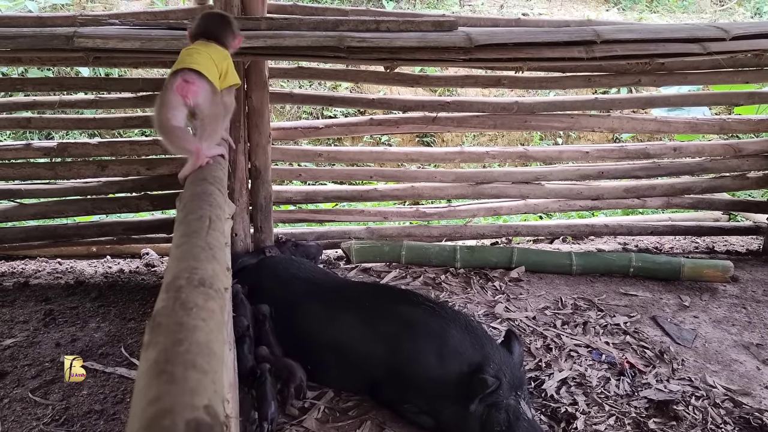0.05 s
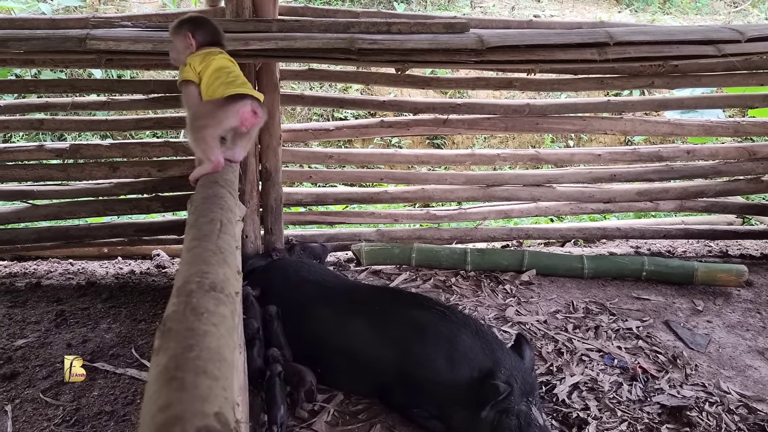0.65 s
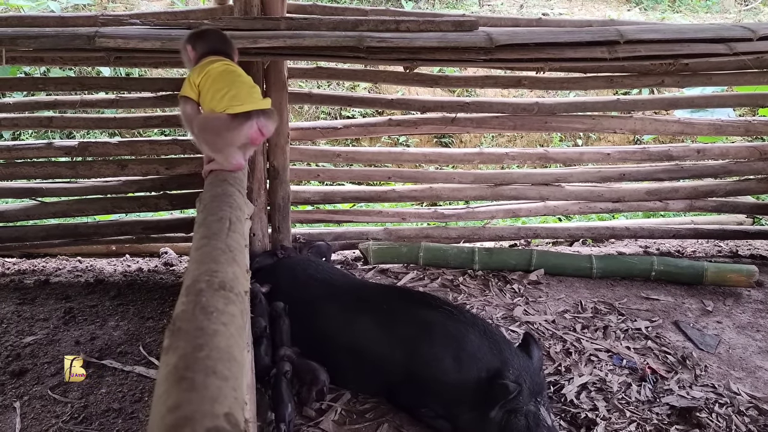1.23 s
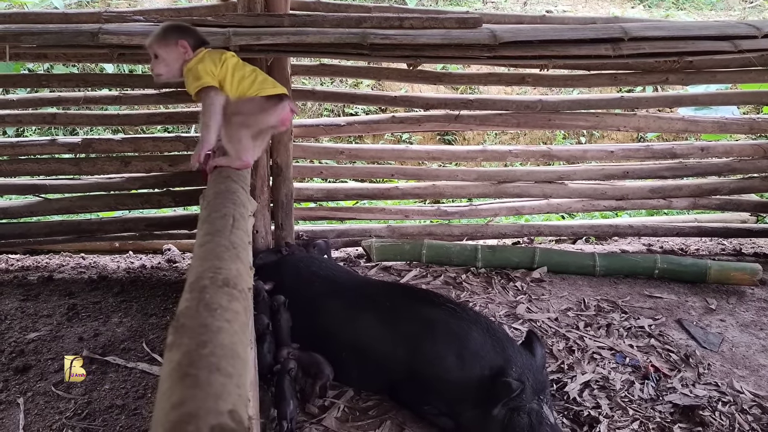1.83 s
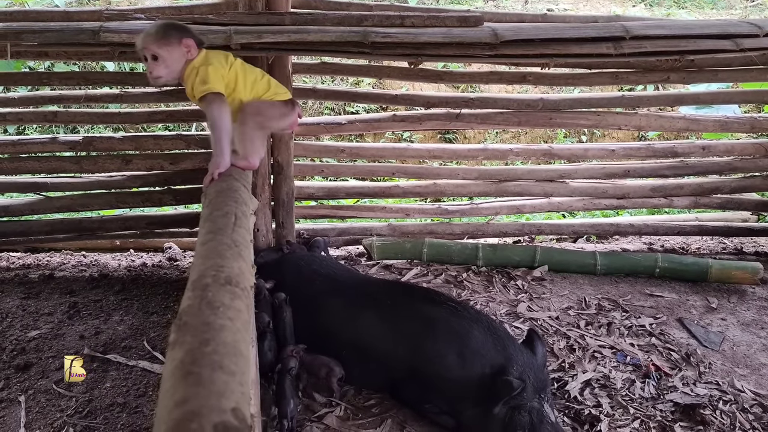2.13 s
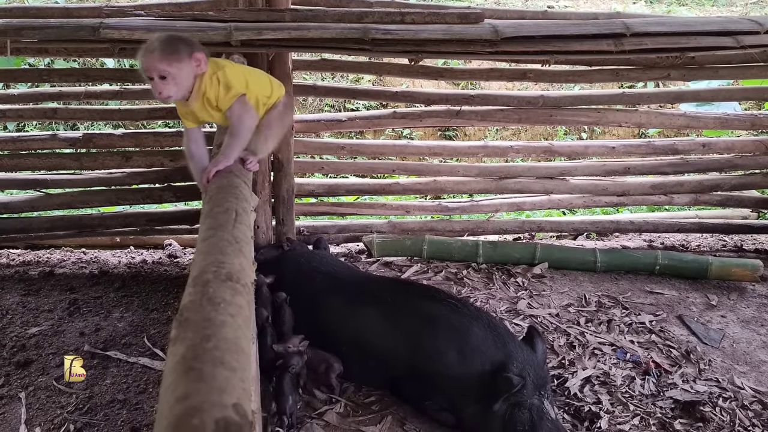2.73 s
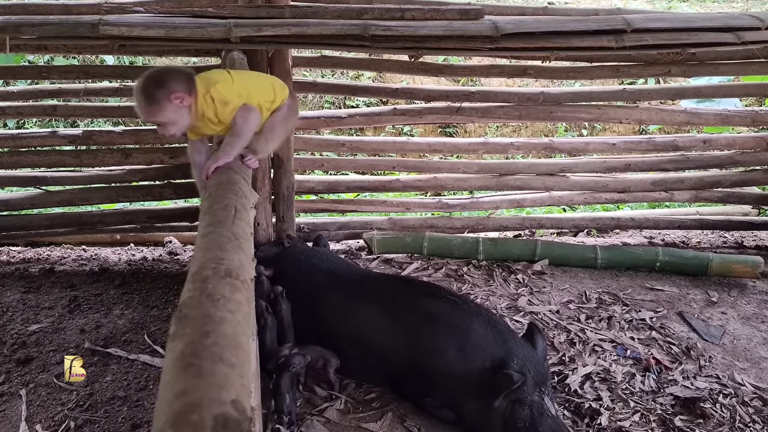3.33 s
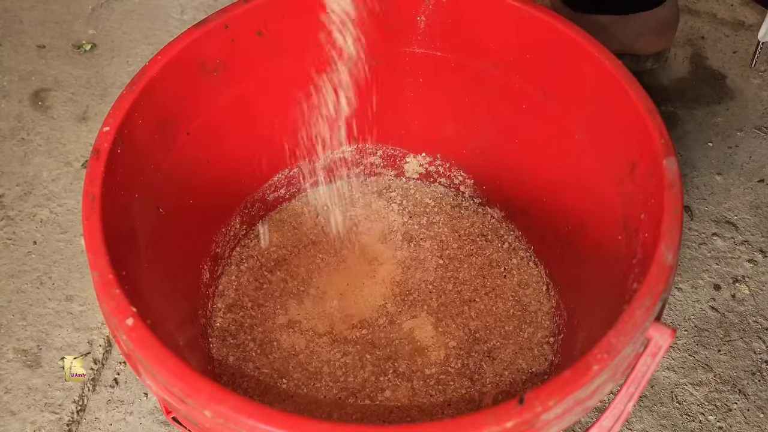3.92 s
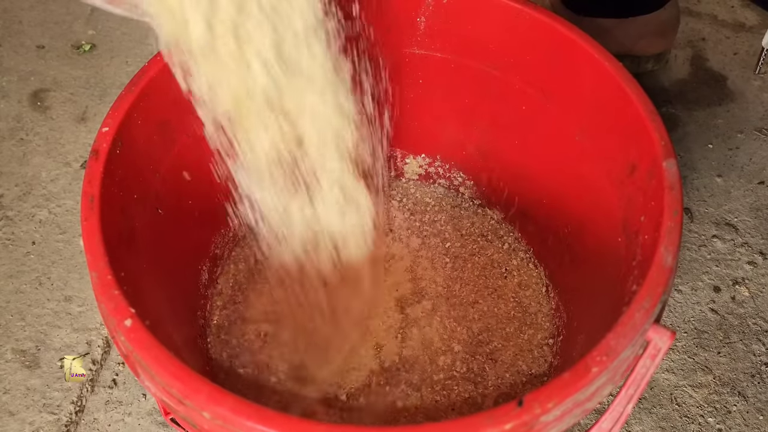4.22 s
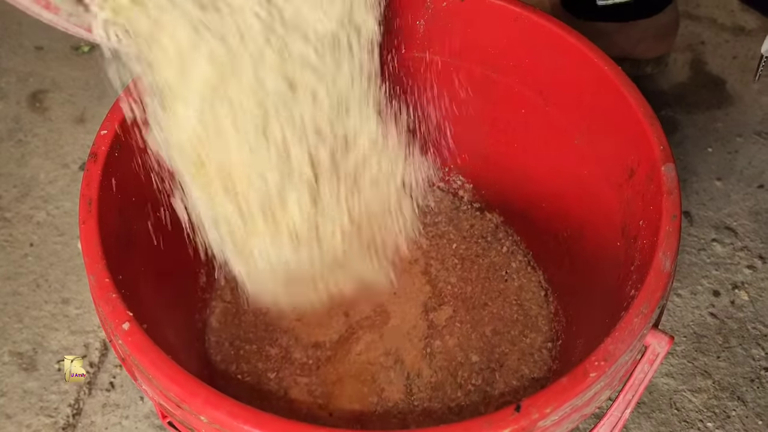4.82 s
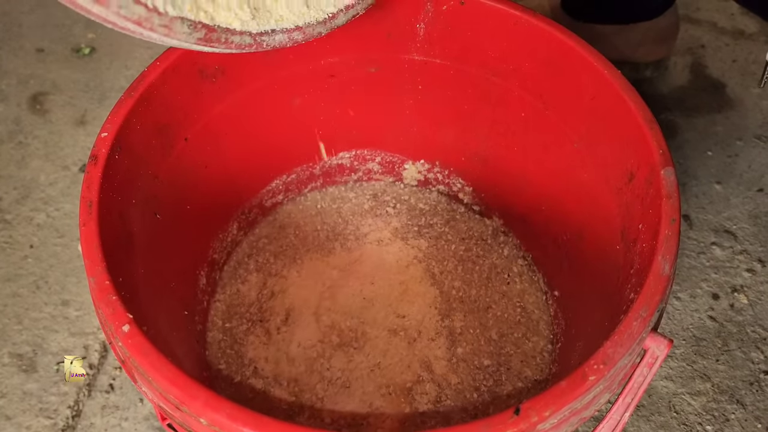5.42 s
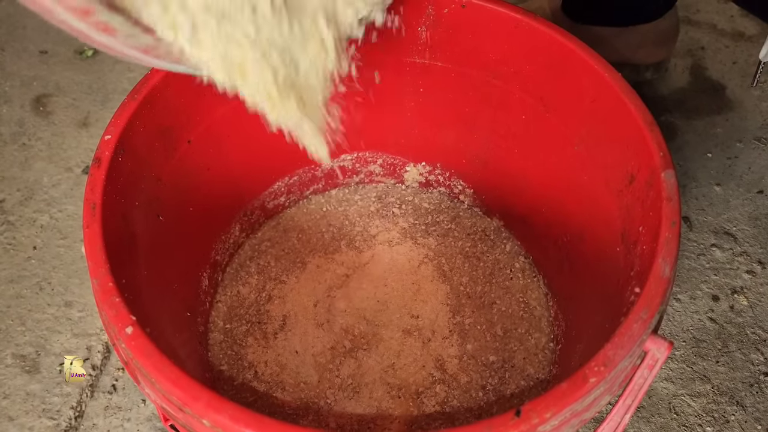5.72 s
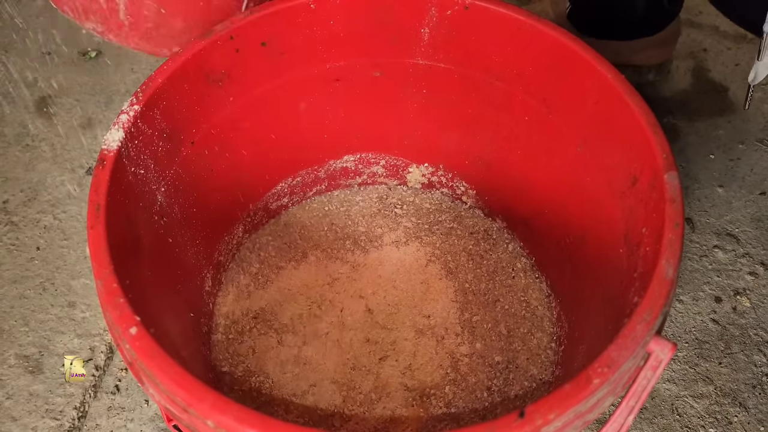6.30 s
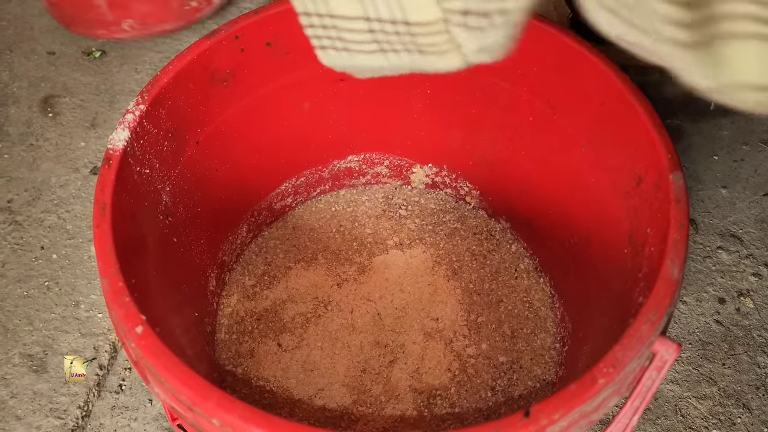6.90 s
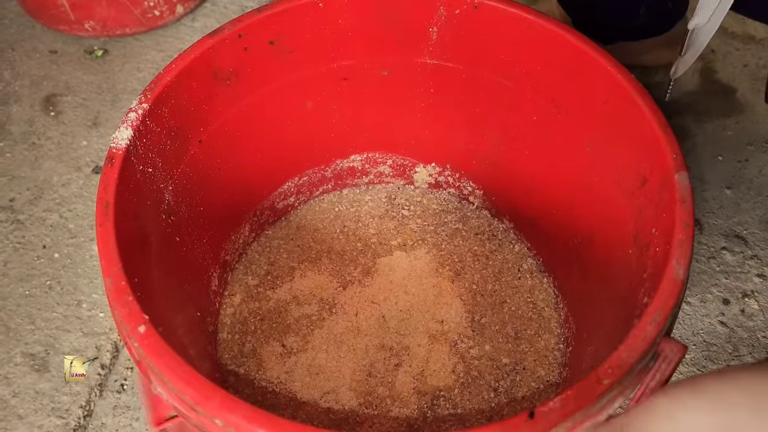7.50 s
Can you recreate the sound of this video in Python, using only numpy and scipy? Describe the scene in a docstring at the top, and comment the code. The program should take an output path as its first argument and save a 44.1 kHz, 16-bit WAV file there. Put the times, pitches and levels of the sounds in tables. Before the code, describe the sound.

In a quiet outdoor pen a pig grunts softly twice while cicadas drone, a bird whistles and a faint, distant rooster crows once. The sound switches to a yard with shriller cicadas. Close by, a bowl digs dry meal from a sack with hollow knocks and pours it, hissing and pattering, into a plastic bucket. Finally the sack crumples and the bowl is put down with a loud thud.

```python
"""In a slatted pen a pig grunts softly twice, its throat pulses ringing chest and snout, while cicadas
drone with clicking tymbals. A bird whistles now and then, and a far rooster holds one crow.
Then, in a yard with shriller cicadas, a bowl digs dry meal from a sack and pours it into a plastic
bucket: impacts ring the bowl, friction rasps, and falling grains hiss and patter.
At the end the sack crumples in small snaps and the bowl is put down with a thud."""
import sys
import numpy as np
from scipy import signal
from scipy.fft import rfft, irfft, next_fast_len
from scipy.io import wavfile
from scipy.ndimage import uniform_filter1d

SR = 44100
rng = np.random.default_rng(int(sys.argv[2]) if len(sys.argv) > 2 else 0)


def master_out(mix):
    """Clip the mix to full scale and print it as 16-bit PCM to the path in sys.argv[1]."""
    frames = np.transpose(np.atleast_2d(mix))
    ceiling = np.clip(frames, -1, 1)
    pcm = np.round(ceiling * 32767).astype(np.int16)
    wavfile.write(sys.argv[1], SR, pcm)


N = 332955
TIME = np.arange(N) / SR

# grunts (time [s], length [s], effort [dB], first pulse rate [Hz], mouth opening [dB])
PIG_GRUNTS = [(0.188, 0.104, -56, 89, 0), (0.665, 0.19, -37.5, 75.9, 4.5)]
# resonances of the pig's chest and snout (frequency [Hz], bandwidth [Hz], gain [dB])
CHEST_FORMANTS = [(58, 30, -11), (184, 50, 4), (254, 44, 7), (443, 67, -8)]
SNOUT_FORMANTS = [(590, 200, -26), (1180, 160, -21.5), (1562, 63, -22.5), (3200, 900, -36)]
# the bowl knocks into the meal, thumps out of it, and clatters as it is put down
# (time [s], push level [dB], push frequency [Hz], clack level [dB], clack centre [Hz], chatter decay [s])
BOWL_BUMPS = [(3.9261, -28, 470, -39.5, 1470, 0.0014), (4.057, -23, 145.5, -41, 1490, 0.0057),
              (4.686, -29.5, 448, -41, 1380, 0.0041), (4.775, -25, 144, -41, 1310, .0027),
              (5.647, -41.5, 410, -79, 1000, 0.002), (5.724, -31.5, 141, -50.5, 1310, 0.0036),
              (6.5249, -36, 384, -38.5, 1650, 0.0022), (6.826, -26.5, 97, -36, 1925, 0.024),
              (6.8599, -36, 380, -32, 1240, 0.0045), (6.9, -36, 280, -35, 1134, 0.014),
              (6.96, -38, 380, -35, 1794, 0.0061), (7.0257, -6.5, 350, -28, 1550, 0.006),
              (7.056, -21.5, 281, -38.5, 2300, 0.0035)]
# modes of the whole bowl (frequency [Hz], gain [dB], T60 after a 400 Hz push [s])
BOWL_MODES = [(131.2, -14.5, 0.35), (162.2, -4.5, 0.26), (221, -15, 0.07), (304, -7.5, 0.27),
              (339.8, 10.5, 0.079), (394, 0, 0.16), (474, 0, 0.097), (531.3, -1, 0.14), (943, -12.5, 0.11),
              (2270, -12.5, 0.4)]
# short, hollow modes of its wall (frequency [Hz], bandwidth [Hz], gain [dB])
WALL_MODES = [(560, 81, 9.5), (1000, 80, 0), (1298, 150, 6), (1805, 110, 3.5), (2110, 210, 10),
              (3070, 290, 11)]
# rubs of bowl, meal and litter (peak time [s], level [dB], swell time [s], tilt [dB/octave])
RUB_STROKES = [(0.046, -50.5, 0.02, 3), (1.42, -64.5, 0.039, 5), (2.031, -58, 0.058, 4.5),
               (3.6, -60, 0.14, 3), (3.984, -37.5, 0.039, 0.5), (4.722, -40, 0.033, -0.15),
               (5.7, -51.5, 0.035, 0.5), (6.195, -52.5, 0.097, 1.5), (7.048, -29.5, 0.017, -2.3)]
# pours of meal (time [s], length [s], decay [s], spray level [dB], patter level [dB])
MEAL_POURS = [(3.764, 0.28, 0.087, -57.5, -60), (4.15, 0.12, 0.21, -54, -64),
              (4.894, 0.073, 0.16, -57, -64.5), (5.892, 0.15, 0.036, -57, -57),
              (6.047, 0.032, 1, -64.5, -55.5), (6.716, 0.23, 0.11, -58.5, -54.5),
              (7.342, 0.076, 0.058, -64, -55)]
# crumples of the sack and ticks of the bowl (time [s], level [dB], length [s], tilt [dB/octave])
SACK_CRUMPLES = [(4.171, -42, 0.013, 3), (4.493, -47.5, 0.0033, 5), (4.898, -50, 0.028, 0),
                 (6.527, -30, 0.003, -2), (6.822, -38.5, 0.025, -2.5), (6.865, -35, 0.012, -2),
                 (6.895, -34.5, 0.025, -1.5), (6.956, -38.5, 0.026, -2), (6.99, -35.5, 0.03, -2),
                 (7.018, -32, 0.0029, 5.5)]
# spectra of rubbing, fine meal, coarse meal and the sack (frequency [Hz], relative density [dB])
RUB_SPECTRUM = [(35, -31), (60, -4.5), (156, 4), (215, -8), (368, -6.5), (756, -20), (999, -1.5),
                (1200, -17), (1420, -5), (2200, -6), (5580, -12.5), (15500, -24.5)]
SPRAY_SPECTRUM = [(2500, -28), (4000, 19), (6500, 15.5), (10000, 11.5), (15500, 14)]
PATTER_SPECTRUM = [(100, -13), (330, 2), (650, -7.5), (1000, 0), (1700, 1.5), (2400, 5.5), (3600, -0.5),
                   (6000, -14.5), (12000, -35)]
SACK_SPECTRUM = [(35, -16), (171, -8), (385, -4), (673, -18), (1100, -7), (3580, -6), (8470, -11),
                 (15500, -17)]
# scrapes and light taps (time [s], length [s], level [dB], resonance [Hz], bandwidth [Hz])
HOLLOW_SCRAPES = [(3.044, 0.039, -57, 1750, 905), (3.955, 0.052, -39.5, 2275, 190),
                  (4.196, 0.27, -59, 960, 330), (5.017, 0.028, -55, 2470, 450),
                  (5.128, 0.053, -56, 1960, 650), (5.289, 0.022, -57, 2300, 700),
                  (6.641, 0.015, -44, 2850, 1490), (7.264, .009, -48, 2500, 1110),
                  (7.363, 0.14, -51.5, 1690, 490), (7.514, .016, -49.5, 2310, 806)]
# phrases of the cicada by the pen (start [s], end [s], level [dB])
CICADA_PHRASES = [(-.35, 0.222, -62.5), (0.74, 1.412, -61), (1.68, 2.493, -60.5), (2.798, 3.732, -61.5)]
# swell of the cicadas by the yard (time [s], level of each broad band [dB])
CHORUS_LEVELS = [(3.8, -68), (4.1, -64), (5.2, -61)]
# bird notes (time [s], length [s], start pitch [Hz], end pitch [Hz], relative level [dB])
BIRD_WHISTLES = [(0.859, 0.072, 2850, 4450, -58), (1.183, 0.042, 3210, 2810, -61.5),
                 (1.969, 0.026, 1000, 1040, -60.5), (1.363, 0.071, 2910, 4130, -59.5),
                 (1.815, 0.075, 4570, 2915, -60), (2.703, 0.08, 2890, 4290, -61),
                 (2.84, 0.043, 4380, 4310, -54), (2.893, 0.068, 4390, 2950, -57.5),
                 (5.377, 0.072, 4790, 3860, -55), (5.46, 0.22, 3240, 3310, -64),
                 (7.187, 0.036, 4570, 3906, -53)]
# swells of the crow (crest time [s], half-width [s], relative level [dB])
ROOSTER_SWELLS = [(2.55, 0.088, -66), (2.86, 0.15, -65), (3.16, 0.072, -63), (3.42, 0.11, -62.5),
                  (3.68, 0.053, -62.5)]
# spectra of the steady air in the two places (frequency [Hz], relative density [dB])
PEN_SPECTRUM = [(25, -9), (58, -2.5), (100, 2.5), (170, -1), (300, -13), (620, -9), (1400, -11.5),
                (2650, -15.5), (3250, -7), (3700, -13.5), (5600, -16.5), (8200, -10), (10800, -31),
                (15500, -29.5)]
YARD_SPECTRUM = [(25, -8.5), (50, 10), (100, 6.5), (320, -16.5), (720, -8.5), (1100, -17), (2300, -8),
                 (2800, -5), (4700, 1.5), (5800, -12), (7200, -6.5), (10000, -6.5), (11500, -22),
                 (15500, -38.5)]
# decay of the reflections (frequency [Hz], T60 [s])
REVERB_TIMES = [(80, 0.25), (350, 0.27), (900, 0.28), (2200, 0.25), (6000, 0.2), (14000, 0.051)]
# likeness of left and right (frequency [Hz], correlation [-1 to 1])
STEREO_COHERENCE = [(120, 0.92), (480, 0.63), (800, -0.04), (2200, 0.067), (3800, -0.34), (7000, 0.074)]

YARD_START_S, BAND_LIMIT_HZ = 3.78, 15700


def pig():
    """Source and filter: slowing throat pulses ring the chest; breath rasps in the snout as it opens."""
    rise, fade_start, sag = 0.25, 0.37, 0.175  # shares of the grunt's length
    opens, snap, close = 0.2, 0.05, 0.52  # the mouth's motion, in the same shares
    slack_hz, fade_db = 40.37, 22
    out = np.zeros(N)
    for start, length, effort_db, first_hz, mouth_db in PIG_GRUNTS:
        progress = np.arange(0, length, 1 / SR) / length
        spent = np.interp(progress, [fade_start, 1], [0, 1])
        effort = np.minimum(progress / rise, 1) ** 1.7 * gain_of(-fade_db * spent)
        mouth = gain_of(mouth_db) * np.clip((progress - opens) / snap, 0, 1)
        mouth *= np.exp(-((progress - opens - snap) / close) ** 2)
        pulse_hz = slack_hz + (first_hz - slack_hz) * np.exp(-progress / sag)
        cycles = np.cumsum(pulse_hz * (1 + .025 * wander(len(progress), 70))) / SR
        pulses = np.diff(np.floor(cycles), prepend=0)
        puffs = .08 * np.exp(-(cycles % 1) / .35) * rng.standard_normal(len(progress))
        sink = 1 - 0.24 * spent  # the throat slackens, so its resonances sink
        chest = sum(gain_of(db) * resonate(pulses, hz * sink, width) for hz, width, db in CHEST_FORMANTS)
        snout = sum(gain_of(db) * resonate(puffs, hz, width) for hz, width, db in SNOUT_FORMANTS)
        add(out, start, gain_of(effort_db) * effort * unit_rms(chest + mouth * snout))
    return out + gain_of(-17) * reverb(out)


def bowl_bumps():
    """Impact excitation: a heavily damped push, the low ring of the bowl and a hollow clack."""
    out, t = np.zeros((2, N)), np.arange(SR // 2) / SR
    for start, push_db, push_hz, clack_db, clack_hz, chatter_s in BOWL_BUMPS:
        age = t * push_hz / 0.54  # the envelope peaks after about half a cycle
        push = -np.sin(2 * np.pi * push_hz * t) * age * np.exp(1 - age)
        ring_db = push_db - 15 - 5 * np.log2(push_hz / 146)  # slow pushes ring the bowl more
        ring = gain_of(ring_db) * bowl_ring(push_hz, t)
        clack = gain_of(clack_db) * wall_clack(clack_hz, chatter_s, t)
        add(out, start, gain_of(push_db) * push + ring + clack)
    return panned(out, right_db=-1.5)


def bowl_ring(push_hz, t):
    """Modal decay: a soft, slow push damps the bowl sooner and barely excites its high modes."""
    ring = np.zeros((2, len(t)))
    for hz, db, t60 in BOWL_MODES:
        decay_db = 60 * t / (t60 * (push_hz / 400) ** 0.33)
        rolloff = np.hypot(1, hz / (7.6 * push_hz))
        offset_s = rng.normal(0, 0.0001, (2, 1))  # high modes reach the two sides less alike
        ring += gain_of(db - decay_db) / rolloff * np.sin(2 * np.pi * hz * (t + offset_s))
    return ring * (1 - np.exp(-t / 0.0013))


def wall_clack(centre_hz, chatter_s, t, spread_octaves=0.62):
    """Impulse response: a contact and its chatter ring the wall; the contact point weights the modes."""
    drive = gain_of(-3) * grains(len(t), per_s=4000, spread_db=0) * np.exp(-t / chatter_s)
    drive[:, 0] = 1  # first contact
    wall = np.zeros(len(t))
    for hz, width, db in WALL_MODES:
        weight = gain_of(db) / (1 + (np.log2(hz / centre_hz) / spread_octaves) ** 2)
        wall += weight * np.exp(-np.pi * width * t) * np.sin(2 * np.pi * hz * rng.normal(1, 0.016) * t)
    clack = signal.fftconvolve(drive, wall[None], axes=1)[:, :len(t)]
    return clack / np.sqrt(np.mean(clack[:, :SR // 100] ** 2))  # rms 1 over the first 10 ms


def rubs(lead_s=.3, fall_ratio=0.98):
    """Granular friction: grains grind under a stroke that swells and dies exponentially."""
    out, t = np.zeros((2, N)), np.arange(SR) / SR
    for peak, db, swell_s, tilt_db in RUB_STROKES:
        start = max(peak - lead_s, 0)
        past_peak = t + start - peak
        stroke = np.exp(np.where(past_peak < 0, past_peak, -past_peak / fall_ratio) / swell_s)
        grinding = colour(grains(SR, per_s=11000, spread_db=-3), RUB_SPECTRUM, tilt_db)
        add(out, start, gain_of(db) * stroke * grinding)
    return out


def pouring_meal():
    """Shot noise: fine meal hisses off the lip, patter builds on the heap, then both trickle out."""
    fine, coarse = np.zeros((2, N))
    for start, length, decay_s, spray_db, patter_db in MEAL_POURS:
        flow = np.exp(-np.maximum(TIME - start - length, 0) / decay_s)
        fine += gain_of(spray_db) * flow * np.clip((TIME - start) / .025, 0, 1)
        coarse += gain_of(patter_db) * flow * np.clip((TIME - start) / 0.11, 0, 1)
    spray = colour(grains(N, per_s=37000, spread_db=0.5), SPRAY_SPECTRUM)
    patter = patchy(colour(grains(N, per_s=1100, spread_db=3.2), PATTER_SPECTRUM), depth_db=3.5)
    return (spray * fine + patter * coarse) * gain_of(wander(N, 35))  # the meal slides in lumps


def sack_crumples():
    """Buckling: each fold gives way in a short clump of snaps."""
    out, t = np.zeros((2, N)), np.arange(SR // 4) / SR
    for start, db, length, tilt_db in SACK_CRUMPLES:
        rise = np.minimum(t / (0.25 * length), 1)
        decay = np.exp(-np.maximum(t - 0.59 * length, 0) / (0.76 * length))
        snaps = colour(grains(len(t), per_s=3500, spread_db=1), SACK_SPECTRUM, tilt_db)
        add(out, start, gain_of(db) * snaps * rise * decay)
    return panned(out, right_db=-1.5)


def scrapes():
    """Forced resonance: brief friction rings one spot of the bowl or of a pole in the pen."""
    out = np.zeros((2, N))
    for start, length, db, hz, width in HOLLOW_SCRAPES:
        n = int(length * SR)
        ring = unit_rms(resonate(grains(n, per_s=5000, spread_db=2), hz, width))
        add(out, start, gain_of(db) * np.hanning(n) * ring)
    return out


def pen_cicadas(base_hz=4324., climb_hz=362, throb_hz=21.64, stop_s=0.061):
    """Modulation: over a drone, each throbbing phrase gains level and pitch with effort, then stops."""
    hz, level = np.full(N, base_hz), np.zeros(N)
    for start, end, db in CICADA_PHRASES:
        effort = np.clip((TIME - start) / (end - start), 0, 1)
        hz = np.where(TIME > start, base_hz + climb_hz * np.sin(np.pi / 2 * effort), hz)
        level += gain_of(db) * np.minimum(effort / 0.3, 1) * np.clip((end - TIME) / stop_s + .5, 0, 1)
    throb_cycles = np.cumsum(throb_hz * (1 + 0.043 * wander(N, 3.5))) / SR
    throb = 1 + 0.22 * np.sin(2 * np.pi * throb_cycles)
    phrases = level * throb * tymbals(0, hz, width_hz=370)
    return phrases + tymbals(level_db=-68, hz=4460, width_hz=580)


def yard_cicadas():
    """Superposition: many insects merge into shrill bands; a nearer one stands out as a thin line."""
    db = np.interp(TIME, *np.transpose(CHORUS_LEVELS))
    chorus = tymbals(db, 7830, width_hz=1100) + tymbals(db, 8970, width_hz=740)
    chorus += tymbals(db, 8350, width_hz=480)
    return chorus + tymbals(db - 5.5, 8344, width_hz=60)


def tymbals(level_db, hz, width_hz):
    """Impulse-driven resonance: dense clicks ring a cicada's body at a fluttering level."""
    song = resonate(grains(N, per_s=5000, spread_db=1), hz, width_hz)
    return gain_of(level_db) * unit_rms(song * gain_of(0.47 * wander(N, 35)))


def bird():
    """Frequency modulation: thin whistles glide and quaver, blurred by scattering from the trees."""
    out = np.zeros(N)
    for start, length, start_hz, end_hz, db in BIRD_WHISTLES:
        n = int(length * SR)
        low, high = sorted([start_hz, end_hz])
        height = np.linspace(start_hz > end_hz, start_hz <= end_hz, n) ** 1.35  # lingers at the low end
        quaver = .006 + .05 * np.log(high / low)  # held notes are steadier than glides
        hz = low * (high / low) ** height * (1 + quaver * wander(n, 330))
        tone = np.sin(2 * np.pi * np.cumsum(hz) / SR)
        add(out, start, gain_of(db) * tone * signal.windows.tukey(n, .5))
    out *= gain_of(2 * wander(N, 120))
    return .5 * out + .45 * reverb(out) + .25 * reverb(reverb(out))


def rooster(start_s=2, end_s=3.76, fade_s=0.29):
    """Harmonic series: a far crow's second and third partials swell over a faint fundamental."""
    since, remaining = np.maximum(TIME - start_s, 0), np.maximum(end_s - TIME, 0)
    settle_hz, droop_hz = 190 * np.exp(-since / 0.25), 91.6 * np.exp(-remaining / 0.095)
    second_hz = 1092 + settle_hz - droop_hz
    cycles = np.cumsum(second_hz / 2 * (1 + 0.0109 * wander(N, 93))) / SR
    fundamental, second, third = np.sin(2 * np.pi * np.outer([1, 2, 3], cycles))
    swells = sum(gain_of(db) * np.exp(-((TIME - crest) / width) ** 2)
                 for crest, width, db in ROOSTER_SWELLS)
    held = np.minimum(np.minimum(since, remaining) / fade_s, 1) * gain_of(3 * wander(N, 12))
    overtones = swells * (second + gain_of(-9) * third) * gain_of(3.5 * wander(N, 20) - 1.5)
    voice = overtones + held * gain_of(-84) * fundamental
    return np.array([voice, np.roll(voice, 10)]) + .4 * reverb(voice)  # reaches the right side later


def air(spectrum, level_db):
    """Diffuse field: distant foliage and insects blend into a gently swelling wash."""
    swell_db = .7 * wander(N, 5)
    wash = patchy(colour(rng.standard_normal((2, N)), spectrum), depth_db=1.5)
    return gain_of(level_db + swell_db) * wash


def reverb(x):
    """Reverberation: scattered reflections arrive after 4 ms, each band dying at its own rate."""
    reflections = colour(rng.standard_normal((2, SR // 2)), [(20, 0), (20000, 0)])
    hz, t, bands = signal.stft(reflections, SR, nperseg=256)
    decay = gain_of(-60 * t / value_at(REVERB_TIMES, hz)[:, None]) * (t > .004)
    tail = signal.istft(bands * decay, SR, nperseg=256)[1]
    return signal.fftconvolve(x * np.ones((2, 1)), tail / np.linalg.norm(tail[0]), axes=1)[:, :N]


def grains(n, per_s, spread_db):
    """Poisson process: tiny impacts at shared times, with a random size on each side."""
    size = gain_of(spread_db * np.minimum(rng.exponential(1, n), 4)) * (rng.random(n) < per_s / SR)
    return size * rng.standard_normal((2, n))


def resonate(x, hz, width_hz):
    """Resonance: a steep band-pass of gain 1 whose centre may follow a curve."""
    carrier = np.exp(2j * np.pi * np.cumsum(hz * np.ones(x.shape[-1])) / SR)
    pole = np.exp(-np.pi * width_hz / SR)
    baseband = signal.lfilter([(1 - pole) ** 2], [1, -2 * pole, pole * pole], x / carrier + 1e-18)
    return 2 * (carrier * baseband).real


def colour(pair, spectrum, tilt_db=0):
    """Spectral shaping: two independent noises become a stereo pair of rms 1, coherent in the bass."""
    n = pair.shape[-1]
    size = next_fast_len(n)
    hz = np.fft.rfftfreq(size, 1 / SR)
    left, independent = rfft(pair, size)
    coherence = value_at(STEREO_COHERENCE, hz)
    right = coherence * left + np.sqrt(1 - coherence ** 2) * independent
    shape = gain_of(value_at(spectrum, hz) + tilt_db * np.log2(np.maximum(hz, 200)))
    return unit_rms(irfft(np.array([left, right]) * shape * (hz < BAND_LIMIT_HZ), size)[:, :n])


def patchy(x, depth_db):
    """Spectral fluctuation: the level shifts in small patches of time and frequency."""
    bands = signal.stft(x)[2]
    patches = uniform_filter1d(rng.standard_normal(bands.shape[1:]), size=12, axis=0)
    patches = unit_rms(uniform_filter1d(patches, size=3, axis=1))
    return unit_rms(signal.istft(bands * gain_of(depth_db * patches))[1][:, :N])


def wander(n, rate_hz):
    """Low-pass noise: a random drift with rms near 1."""
    lowpass = np.exp(-(np.fft.rfftfreq(N, 1 / SR) / rate_hz) ** 2)
    return unit_rms(irfft(rfft(rng.standard_normal(N)) * lowpass, N))[:n]


def panned(x, right_db):
    """Level panning: the right side lies right_db above the left."""
    return x * gain_of(np.array([[-right_db], [right_db]]) / 2)


def add(mix, start_s, sound):
    """Superposition: a sound joins the mix at its start time."""
    part = mix[..., max(round(start_s * SR), 0):][..., :sound.shape[-1]]
    part += sound[..., :part.shape[-1]]


def value_at(table, hz):
    """Interpolation along log frequency."""
    table_hz, values = np.transpose(table)
    return np.interp(np.log(hz + 1), np.log(table_hz + 1), values)


def gain_of(db):
    """Conversion of decibels to amplitude."""
    return 10 ** (np.asarray(db) / 20)


def unit_rms(x):
    """Normalisation to rms 1."""
    return x / np.sqrt(np.mean(x ** 2) + 1e-20)


def scene():
    """Superposition of all sources, with a quick crossfade from the pen to the yard."""
    chorus = yard_cicadas()
    pen = panned(air(PEN_SPECTRUM, level_db=-66), right_db=-2.5) + pen_cicadas()
    yard = air(YARD_SPECTRUM, level_db=-57.5) + chorus + pouring_meal()
    in_yard = np.clip((TIME - YARD_START_S) / 0.032 + .5, 0, 1)
    place = (1 - in_yard) * pen + in_yard * yard
    left, right = rubs() + sack_crumples() + scrapes() + bowl_bumps()
    handling = np.array([left, np.roll(right, round(0.00014 * SR))])  # the bowl is to the left
    return place + bird() + rooster() + pig() + handling + gain_of(-11.5) * reverb(handling)


def record(dry):
    """Linear filtering: a treble shelf brightens the left and dulls the right; a low-pass follows."""
    highpass = signal.firwin(31, 6600, pass_zero=False, fs=SR)
    lowpass = signal.firwin(511, BAND_LIMIT_HZ, window=("kaiser", 9), fs=SR)
    treble = signal.oaconvolve(dry, highpass[None], "same")
    shelved = dry + np.array([[.26], [-.26]]) * treble
    return signal.oaconvolve(shelved, lowpass[None], "same")


dry = scene()
out = record(dry)
master_out(out)
```